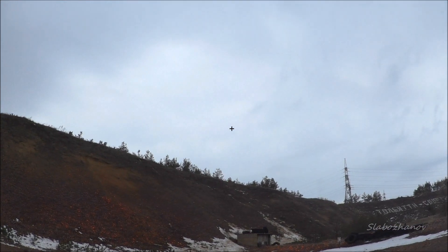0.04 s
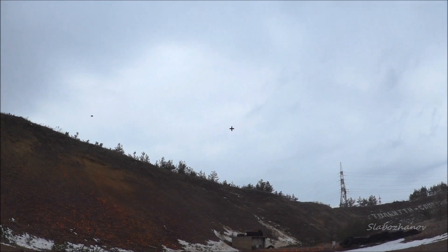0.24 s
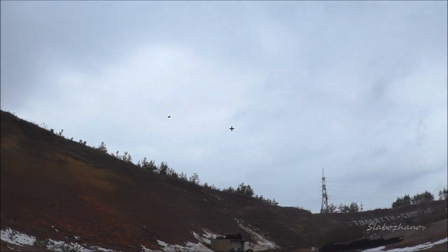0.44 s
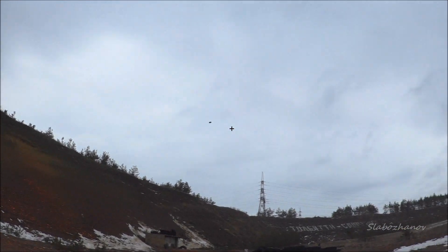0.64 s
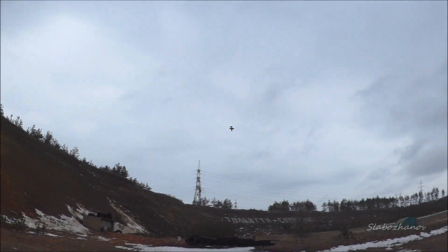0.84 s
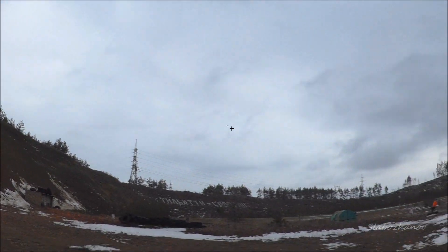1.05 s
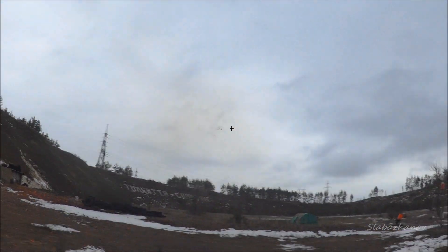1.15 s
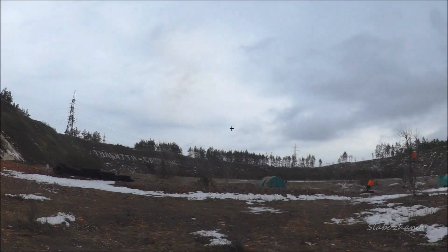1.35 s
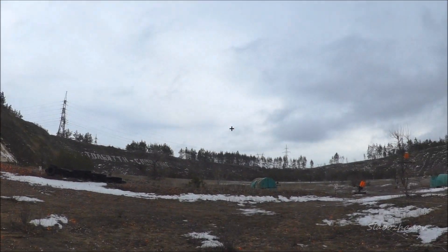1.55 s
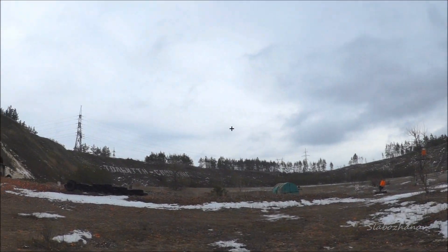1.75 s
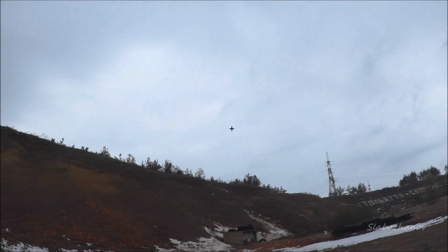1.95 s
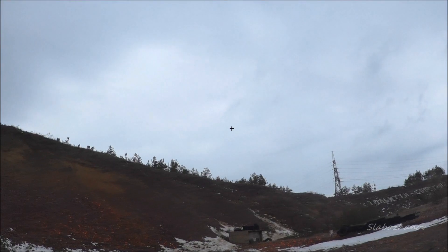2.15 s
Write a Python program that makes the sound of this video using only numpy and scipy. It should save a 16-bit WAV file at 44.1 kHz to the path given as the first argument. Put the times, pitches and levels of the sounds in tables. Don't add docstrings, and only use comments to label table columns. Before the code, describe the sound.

A shotgun fires once in an open field, its punchy blast rolling into a short echo; the action then slams with a metallic rattle. Wind rumble and dull knocks throughout, heard through a sealed camera on the barrel.

```python
import sys
import numpy as np
from scipy import signal
from scipy.fft import rfft, irfft
from scipy.io import wavfile
from scipy.ndimage import uniform_filter1d

SR = 44100
rng = np.random.default_rng(int(sys.argv[2]) if len(sys.argv) > 2 else 0)


def master(y):
    cut = np.clip(np.atleast_2d(y).T, -1, 1)
    pcm = np.round(cut * 32767)
    wavfile.write(sys.argv[1], SR, pcm.astype(np.int16))


def attenuation_scalar(level_db):
    decades = np.asarray(level_db, float) / 20
    return 10 ** decades


N = 97020


def at_time():
    return np.arange(N) / SR


def coloured(points):
    hz, db = np.transpose(points)
    f = np.maximum(np.fft.rfftfreq(N, 1 / SR), 1)
    colour_db = np.interp(np.log(f), np.log(hz), db, left=db[0] - 1.5)
    x = irfft(rfft(rng.standard_normal(N)) * attenuation_scalar(colour_db), N)
    return x / x.std()


def drift(rate):
    r = np.exp(-2 * np.pi * rate / SR)
    x = signal.lfilter([1], [1, -2 * r, r * r], rng.standard_normal(N + SR))[SR:]
    return x / x.std()


def even(x, s):
    return x / np.sqrt(uniform_filter1d(x * x, size=int(s * SR)) + 1e-12)


def dying(s, db, t60, hold=0., rise=0.00016):
    t = at_time() - s
    fall_db = 60 * np.clip(t - hold - rise, 0, None) / t60
    return attenuation_scalar(db - fall_db) * np.clip(t / rise, 0, 1)


def peak(x, hz, width):
    r = np.exp(-np.pi * width / SR)
    zeros = np.array([1, 0, -1]) * (1 - r * r) / 2
    return signal.lfilter(zeros, [1, -2 * r * np.cos(2 * np.pi * hz / SR), r * r], x)


def dull(x, hz):
    return signal.sosfilt(signal.butter(4, hz, fs=SR, output="sos"), x)


def mode(s, hz, db, t60):
    return dying(s, db, t60) * np.sin(2 * np.pi * hz * (at_time() - s))


# t/s, peak level/dB, half width/s
BLASTS = [
    (0.183, 2.5, 0.00089),
    (0.8763, 2.5, 0.00026),
    (1.1259, -15.5, 0.00069),
    (1.2303, -5.5, 0.0002),
    (1.379, -20.5, 0.00041),
    (1.8406, -3.5, 0.00042),
]
ECHO_SHARE_DB = [-32.5, -1, 2.5, -18.5, 0.5, -1.5]
# f/Hz, level/dB per Hz
ECHO_COLOUR = [(88, -28), (150, 0.5), (566, -8), (941, -11), (1020, -17), (2550, -29.5), (4860, -61.5),
               (7040, -43.5), (16000, -51.5)]
SWING_HZ, SWING_T60_S, SWING_DB, SWING_LAG_S = 140, .045, -.5, .0006
SNAP_HZ, SNAP_T60_S, SNAP_DB = 977, 0.0034, -9.5
ECHO_FAST_DB, ECHO_FAST_T60_S = -24, 0.017
ECHO_DB, ECHO_T60_S, ECHO_RISE_S = -26.5, 0.69, .022


def blasts():
    out = 0
    echo = coloured(ECHO_COLOUR) * attenuation_scalar(3.5 * drift(45))
    for (s, db, half), share_db in zip(BLASTS, ECHO_SHARE_DB):
        spike = -attenuation_scalar(db) * np.exp(-.5 * ((at_time() - s) / half) ** 2)
        swing = mode(s + SWING_LAG_S, SWING_HZ, db + SWING_DB, SWING_T60_S)
        snap = mode(s + half, SNAP_HZ, db + SNAP_DB + share_db / 2, SNAP_T60_S)
        near_tail = dying(s, db + ECHO_FAST_DB, ECHO_FAST_T60_S)
        field_tail = dying(s, db + ECHO_DB, ECHO_T60_S, rise=ECHO_RISE_S)
        out = out + spike + swing + snap + attenuation_scalar(share_db) * echo * (near_tail + field_tail)
    return out


# t/s, level/dB, hold/s, t60/s, air level/dB
SLAMS = [
    (1.231, -14, 0.016, 0.045, -15),
    (1.264, -29.5, 0.0045, 0.041, -62),
    (1.347, -29, 0.0041, 0.027, -67),
]
# f/Hz, level/dB per Hz
SLAM_COLOUR = [(100, -12.5), (300, -4), (1000, -5), (2500, -13.5), (4000, -24), (7000, -20), (10000, -21.5),
               (16000, -43.5)]
AIR_HZ, AIR_WIDTH_HZ = 14700, 1000


def slams():
    body = coloured(SLAM_COLOUR)
    air = peak(rng.standard_normal(N), AIR_HZ, AIR_WIDTH_HZ)
    lumps = attenuation_scalar(2.0 * drift(200))
    rattle = 0
    for s, db, hold, t60, air_db in SLAMS:
        rattle = rattle + dying(s, 0, t60, hold) * (attenuation_scalar(db) * body + attenuation_scalar(air_db + 7.5) * air)
    return lumps * rattle


# f/Hz, level/dB, t60/s
GUN = [(105.4, -13, 0.37), (232.5, -15, 0.11), (365, -9.5, 0.067), (508.6, -15.5, 0.04),
       (578, -26.5, 0.074), (730, -41, 0.13), (1010, -47, .18), (3820, -37, 0.22)]
GUN_STRUCK_S = 1.245
GUN_SAG, GUN_SAG_S = 0.054, 0.042


def gun_ring():
    t = np.clip(at_time() - GUN_STRUCK_S, 0, None)
    sagging = t - GUN_SAG * GUN_SAG_S * np.exp(-t / GUN_SAG_S)
    out = 0
    for hz, db, t60 in GUN:
        clock = sagging if hz < 1000 else t
        out = out + dying(GUN_STRUCK_S, db, t60, rise=0.011) * np.sin(2 * np.pi * hz * clock)
    return out


# t/s, peak level/dB, f/Hz
KNOCKS = [(0.054, -29.5, 600), (0.055, -41.5, 2170), (0.192, -26, 900), (0.253, -29, 600),
          (0.278, -29.5, 860), (0.445, -41, 600), (0.837, -37.5, 1200), (0.979, -31, 800),
          (1.042, -29, 1190), (1.16, -17, 850), (1.392, -28.5, 800), (1.521, -44, 600), (1.611, -41, 700),
          (1.646, -17, 457), (1.648, -33.5, 1190), (1.711, -26, 1124), (1.773, -29, 1250),
          (1.774, -47.5, 2800), (1.826, -37.5, 1280), (1.839, -12.5, 626), (1.84, -25, 1900),
          (1.844, -20.5, 1276), (1.887, -33, 804)]
KNOCK_T60_S, KNOCK_WIDTH, KNOCK_TOP = .045, .35, 1.5


def knocks():
    white, out = np.sign(rng.standard_normal(N)), 0
    for s, db, hz in KNOCKS:
        puff = white * dying(s, db, KNOCK_T60_S, rise=0.0003) * np.sqrt(SR / hz / 3)
        knock = peak(peak(puff, hz, KNOCK_WIDTH * hz), hz, hz)
        out = out + dull(knock, KNOCK_TOP * hz)
    return out


# t/s, peak level/dB
TICKS = [(0.0553, -49), (0.5017, -51), (0.5409, -45), (0.585, -79.5), (0.5936, -51.5), (0.6378, -52.5),
         (0.6719, -47), (0.6982, -51), (0.8215, -49.5), (0.9807, -72), (1.0525, -56), (1.0799, -52.5),
         (1.1021, -50.5), (1.1263, -68), (1.1646, -52.5), (1.773, -50), (1.8266, -50.5), (1.8761, -66.5),
         (1.8864, -78.5)]
# from t/s, to t/s
CRACKLE_SPELLS = [
    (.5, 0.85),
    (.88, 1.35),
    (1.72, 2.2),
]
TICK_T60_S, TICK_DB, CRACKLE_PER_S, CRACKLE_DB = 0.014, 5.5, 40, -53.5


def ticks():
    white, t = rng.standard_normal(N), at_time()
    spell = sum((t > a) & (t < b) for a, b in CRACKLE_SPELLS)
    grain_db = CRACKLE_DB + 1.9 * np.minimum(rng.exponential(1, N), 3)
    grains = (rng.random(N) < CRACKLE_PER_S / SR) * spell * attenuation_scalar(grain_db)
    shape = signal.lfilter([1], [1, -attenuation_scalar(-60 / TICK_T60_S / SR)], grains + 1e-18)
    shape = shape + sum(dying(s, db + TICK_DB, TICK_T60_S) for s, db in TICKS)
    return peak(white * shape, 8200, 4000)


# t/s, level/dB, t60/s, f/Hz
BUFFETS = [(0.057, -34, 0.095, 200), (0.169, -9.5, 0.42, 150), (0.195, -7.5, 0.14, 189.9),
           (0.255, -10, 0.11, 140), (0.276, -26, 0.24, 300), (0.444, -26, 0.14, 280),
           (0.555, -22.5, 0.17, 150), (0.978, -21.5, 0.056, 220), (1.123, -24, .1, 141),
           (1.185, -12.5, 0.28, 170), (1.205, -6.5, 0.39, 150), (1.212, -14.5, 0.12, 240),
           (1.527, -26.5, 0.034, 328.7), (1.642, -10.5, 0.09, 110), (1.808, -21.5, 0.13, 246.2),
           (1.88, -12, 0.41, 150)]
BUFFET_RISE_S, BUFFET_WIDTH, BUFFET_TOP = 0.004, 0.51, 2.72
THUMP_DB, THUMP_CYCLES = 4, 4.9
LAST_PUSH_S, LAST_PUSH_HZ, LAST_PUSH_DB, LAST_PUSH_T60_S = 1.930, 70, -14.5, .1


def buffets():
    white = rng.standard_normal(N)
    out = mode(LAST_PUSH_S, LAST_PUSH_HZ, LAST_PUSH_DB, LAST_PUSH_T60_S)
    for s, db, t60, hz in BUFFETS:
        body = even(peak(np.roll(white, int(hz * 90)), hz, BUFFET_WIDTH * hz), 0.014)
        thump = mode(s, hz, db + THUMP_DB, THUMP_CYCLES / hz)
        push = dying(s, db, t60, rise=BUFFET_RISE_S) * body - thump
        out = out + dull(push, BUFFET_TOP * hz)
    return out


# t/s, level/dB
WIND = [(0, -22.5), (.15, -24), (.19, -15), (.34, -17), (.48, -17), (.53, -25), (.58, -19.5), (.7, -28.5),
        (.8, -38), (.87, -35), (.92, -19), (1.1, -34), (1.18, -27), (1.5, -27.5), (1.62, -28.5), (1.7, -28),
        (1.8, -24), (1.93, -15)]
# f/Hz, level/dB per Hz
WIND_COLOUR = [(15, -32.5), (25, -9.5), (55, 1), (150, -2.5), (250, -9.5), (400, -21), (700, -41),
               (1500, -73.5)]
# f/Hz, level/dB per Hz
RUSTLE_COLOUR = [(180, -26), (300, -4.5), (787, -14.5), (1390, -18.5), (3130, -31.5), (4440, -60.5),
                 (6740, -41), (10700, -57), (16000, -49)]
WIND_DB, LUMP_DB, LUMPS_PER_S = -0.5, 3.5, 29
GAIN_DUCK_S, GAIN_DUCK_LENGTH_S, GAIN_DUCK_DB = 1.25, .2, -16
RUSTLE_DB, RUSTLE_FOLLOWS, RUSTLE_LUMP_DB = -53, 0.067, 2.5
CASE_HUM_HZ, CASE_HUM_WIDTH_HZ, CASE_HUM_DB = 1250, 220, 1.5
HUM_SWELL_S, HUM_SWELL_WIDTH_S, HUM_SWELL_DB = .76, .1, 8.5


def wind():
    t = at_time()
    in_duck = 1. * (t > GAIN_DUCK_S) * (t < GAIN_DUCK_S + GAIN_DUCK_LENGTH_S)
    gain_duck = attenuation_scalar(GAIN_DUCK_DB * uniform_filter1d(in_duck, size=600))
    level = attenuation_scalar(WIND_DB + np.interp(t, *np.transpose(WIND)))
    rumble = level * attenuation_scalar(LUMP_DB * drift(LUMPS_PER_S)) * even(coloured(WIND_COLOUR), 0.038)
    rustle = attenuation_scalar(RUSTLE_DB + RUSTLE_LUMP_DB * drift(56)) * coloured(RUSTLE_COLOUR)
    rustle = rustle * (level / level.mean()) ** RUSTLE_FOLLOWS
    hum_db = CASE_HUM_DB + HUM_SWELL_DB * np.exp(-((t - HUM_SWELL_S) / HUM_SWELL_WIDTH_S) ** 2)
    hum = attenuation_scalar(hum_db) * peak(rustle, CASE_HUM_HZ, CASE_HUM_WIDTH_HZ)
    return (rumble + buffets()) * gain_duck + rustle + hum


def scene():
    return np.tile(blasts() + slams() + gun_ring() + knocks() + ticks() + wind(), (2, 1))


# f/Hz, width/Hz, level/dB
CAVITY = [(6844, 640, 1.5), (9875, 1000, -10.5), (11500, 2500, -34.5), (14100, 2400, -4)]
CASE_CUT_HZ, CASE_EDGE_DIP, LEAK_DB = 3646, .4, -34


def sealed_case(x):
    low = signal.sosfilt(signal.cheby1(8, 1, CASE_CUT_HZ, fs=SR, output="sos"), x)
    low = low - CASE_EDGE_DIP * peak(low, 3500, 760)
    high = signal.sosfilt(signal.butter(6, 6000, "high", fs=SR, output="sos"), x)
    out = low + attenuation_scalar(LEAK_DB) * x
    for k, (hz, width, db) in enumerate(CAVITY):
        out = out + attenuation_scalar(db) * (-1) ** k * peak(high, hz, width)
    return out


HISS_DB, HISS_DUCK_DB, HISS_DUCK_S, HISS_RECOVER_DB_PER_S = -71.5, -26, 1.27, 21.5


def preamp_hiss():
    t = at_time()
    recovering = np.minimum(HISS_DUCK_DB + HISS_RECOVER_DB_PER_S * (t - HISS_DUCK_S), 0)
    duck = np.where(t > HISS_DUCK_S, recovering, 0)
    band = signal.butter(3, [13800, 16200], "band", fs=SR, output="sos")
    hiss = signal.sosfilt(band, rng.standard_normal(N))
    return attenuation_scalar(HISS_DB + duck + 2.5 * drift(37)) * hiss / hiss.std()


def band_limit(x):
    return signal.sosfilt(signal.butter(12, 16970, fs=SR, output="sos"), x)


OVERLOAD_TOP, SIDE_DB, SIDE_AIR_DB, RIGHT_DB = 1.7, -37.5, -22, -.25
CUT_S = 1.9339


def record(dry):
    x = sealed_case(dry[0]) + preamp_hiss()
    x = np.clip(OVERLOAD_TOP * np.tanh(x / OVERLOAD_TOP), -1, 1)
    x = signal.sosfilt(signal.cheby2(14, 50, 16600, fs=SR, output="sos"), x)
    side = attenuation_scalar(SIDE_DB) * peak(np.roll(x, 40), 1200, 750)
    side = side + attenuation_scalar(SIDE_AIR_DB) * peak(np.roll(x, 5), 14800, 2300)
    mix = np.array([x + side, attenuation_scalar(RIGHT_DB) * (x - side)]) * (at_time() < CUT_S)
    return band_limit(mix)


dry = scene()
out = record(dry)
master(out)
```